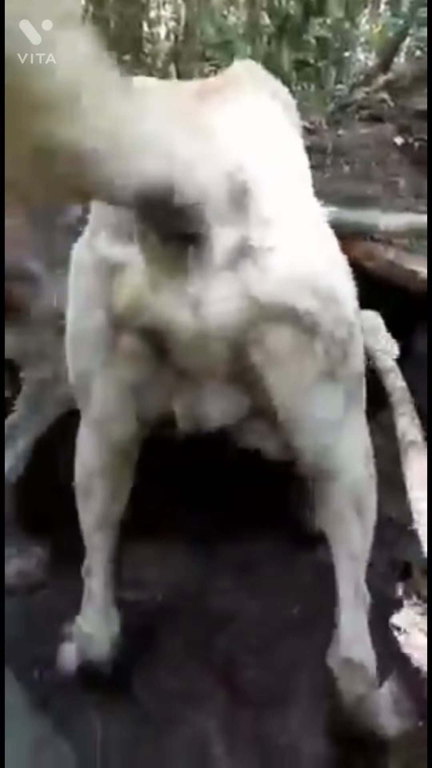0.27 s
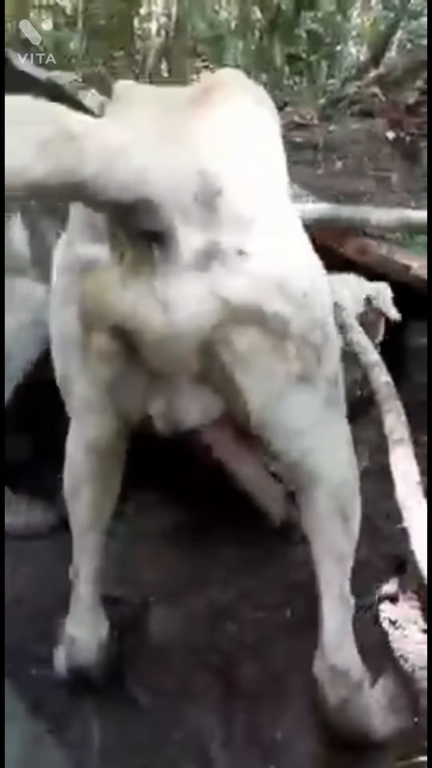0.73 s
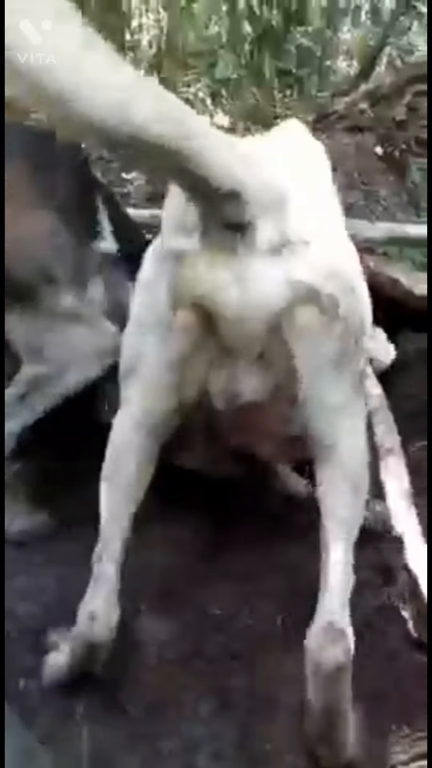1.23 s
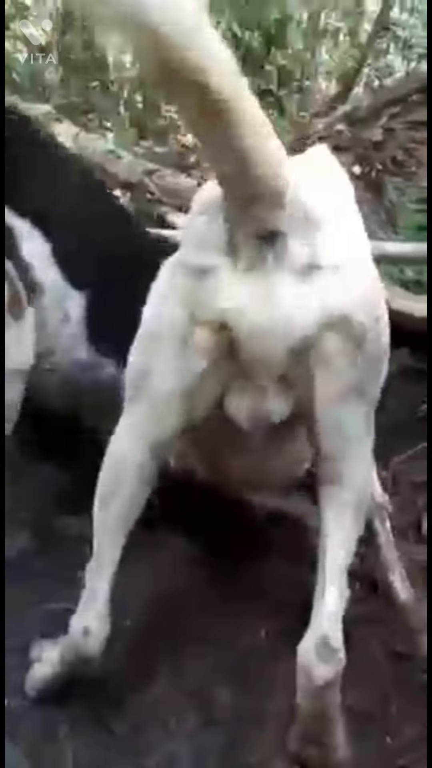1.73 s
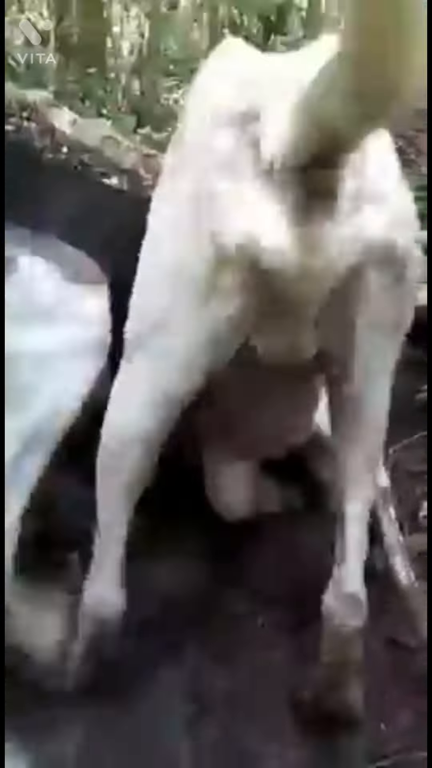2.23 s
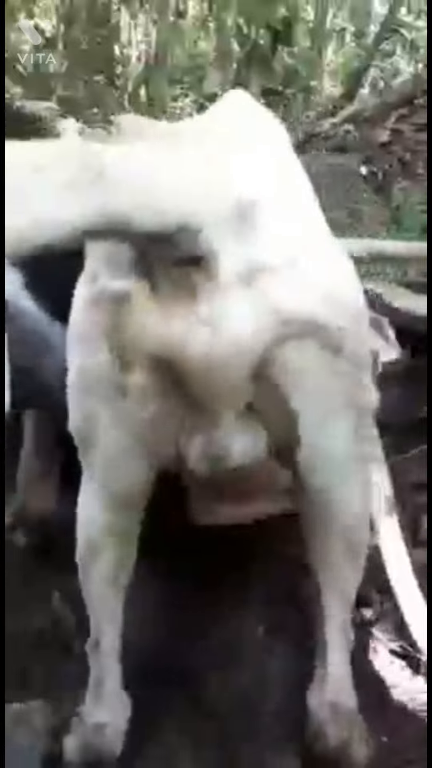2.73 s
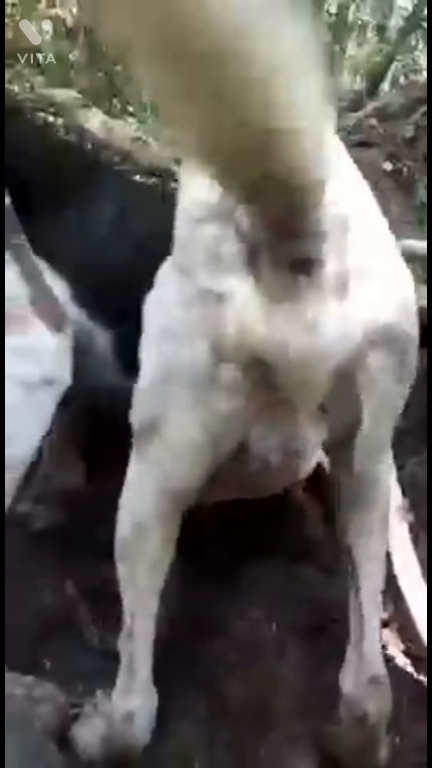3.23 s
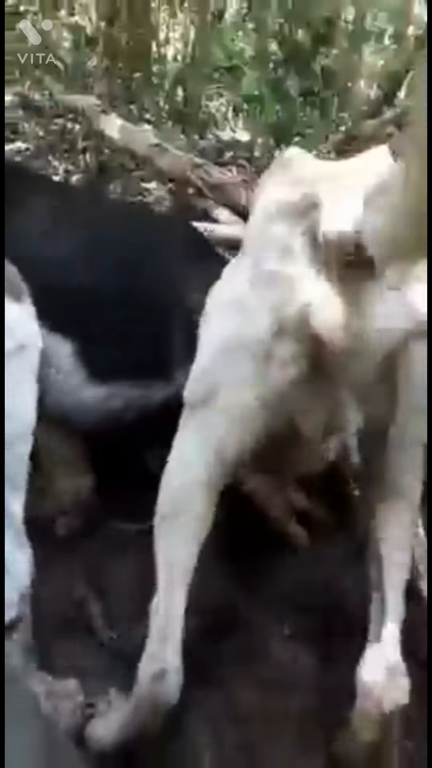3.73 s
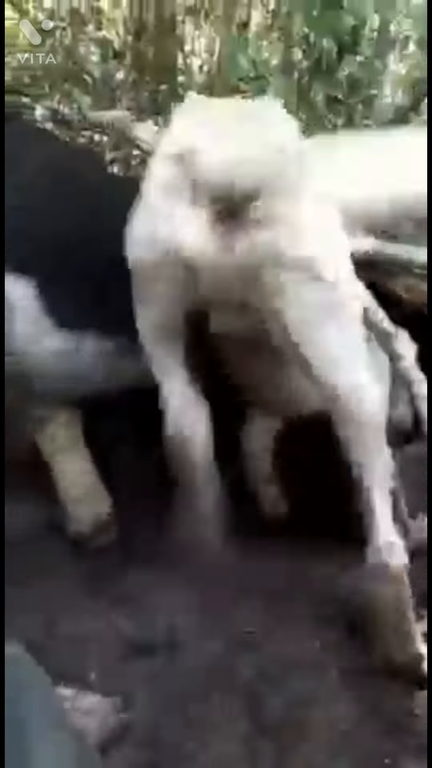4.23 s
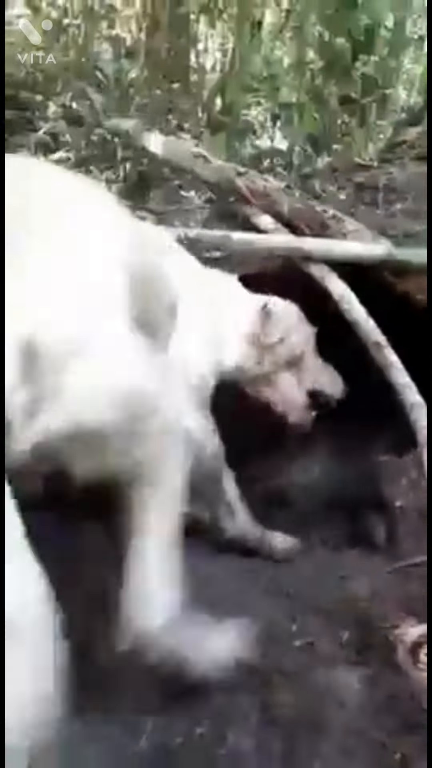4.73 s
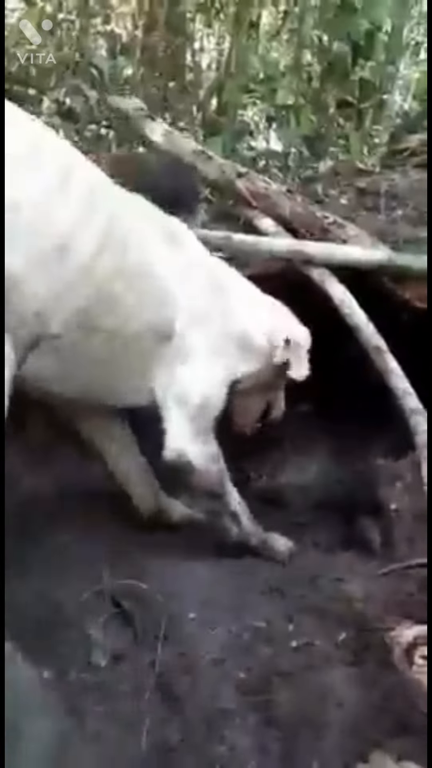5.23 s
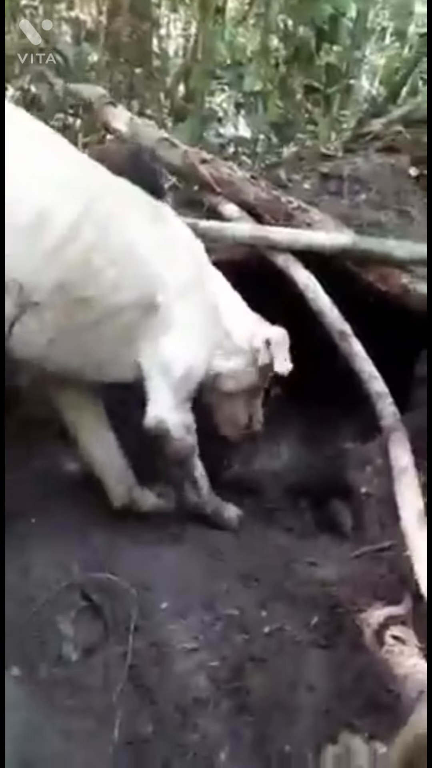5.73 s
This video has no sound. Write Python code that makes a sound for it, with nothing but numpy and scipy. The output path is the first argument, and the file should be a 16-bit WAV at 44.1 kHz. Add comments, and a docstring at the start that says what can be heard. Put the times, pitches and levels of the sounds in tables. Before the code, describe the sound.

Dogs are heard close by in a still wood. At the start one dog holds a clear, slightly rising bay for about 0.8 seconds, with brief growls beneath it and a small yelp at its end. Until 2 seconds there is mostly faint panting, snuffling and scuffling, with soft paw thuds on earth and a few tiny twig snaps. At 2 and 2.3 seconds come two loud barks, arching in pitch and raspy at the edges. Near 2.8 seconds a growl ends in a short hiss through the teeth. Another bark lands at 3.5 seconds, and from 4 to 5 seconds rough barks and short snarls crowd together. At 5 seconds a second, shorter bay cracks briefly and then holds its note. Two barks close, at about 5.5 and 6 seconds. Soft snuffling runs underneath, and the trees give each call a faint tail.

```python
"""Hunting dogs crowd a hole in an earth bank in a wood, close by, panting and snuffling amid soft scuffling.
First one dog bays, its vocal folds holding a clear note. Growls follow, slow pulses ringing the throat,
and at 2 s come two loud barks, arched in pitch and raspy at the edges. Near 3 s a long growl ends in a
hiss through the teeth. Barks and snarls then crowd together, a second bay cracks just after 5 s, and two
barks close the scene. Paws thud now and then, and the trees give each sound a faint tail."""
import sys
import numpy as np
from scipy import signal
from scipy.fft import rfft, irfft, next_fast_len
from scipy.io import wavfile
from scipy.ndimage import uniform_filter1d, minimum_filter1d

SR = 44100
rng = np.random.default_rng(int(sys.argv[2]) if len(sys.argv) > 2 else 0)


def inscribe(sig):
    """Save sig as 16-bit PCM at rate SR to the path in sys.argv[1].

    A 1-D sig is mono; a 2-D sig holds one channel per row.
    Samples are clipped to [-1, 1] before scaling.
    """
    pcm = np.round(np.clip(np.atleast_2d(sig).T, -1, 1) * 32767)
    wavfile.write(sys.argv[1], SR, pcm.astype(np.int16))


N = 263718
TIME = np.arange(N) / SR

# spectrum of still forest air: (frequency [Hz], level [dB])
AIR_SPECTRUM = [(30, -25), (100, -10.5), (330, -3.5), (1000, -10), (2000, -18.5), (3000, -23.5),
                (4000, -33), (6300, -23), (10000, -34)]
# spectrum of the tail among the trees: (frequency [Hz], level [dB])
TAIL_SPECTRUM = [(100, -6.5), (400, -0.5), (1100, -7), (2200, -3.5), (4000, 3.5), (12000, -6.5)]
# side reflections off the bank and the ground: (delay [ms], level [dB])
BANK_ECHOES = [(1.099, -17.5), (2.301, -14), (3.703, -3), (6.1, -12.5)]
# reflections from the mouth of the hole: (delay [ms], level [dB])
HOLE_ECHOES = [(2.12, -19), (5.3, -19.5), (8.4, -16)]
# spectrum of panting, snuffling and soft scuffling: (frequency [Hz], level [dB])
SNUFFLE_SPECTRUM = [(30, -30.5), (100, -6), (430, -2.5), (600, -11.5), (1100, -7.5), (2000, -16.5),
                    (3000, -28), (4000, -35), (6300, -31.5), (10000, -38), (16000, -41)]
# spells of panting and snuffling amid soft scuffling: (start [s], length [s], level [dB])
SNUFFLES = [(0, 1.136, -57.5), (1.05, 0.053, -56), (1.15, 0.088, -52.5), (1.29, 0.21, -59.5),
            (1.6, 0.1, -50.5), (1.88, 1.22, -55), (3.6, 0.067, -45), (3.97, 1.24, -53), (4.8, 1.08, -54.5)]
# paw falls: (time [s], peak level [dB])
PAW_FALLS = [(.05, -44.5), (.932, -38.5), (1.075, -51.5), (1.21, -55), (1.625, -52), (1.765, -51.5),
             (2.665, -53), (3.05, -72.5), (3.645, -55.5), (5.66, -41)]
# resonances of the ground: (frequency [Hz], width [Hz], gain [dB])
GROUND_MODES = [(106, 20, 4), (190, 15, -8), (420, 57, -12)]
# twigs snapping underfoot: (time [s], peak level [dB])
TWIG_SNAPS = [(1.129, -55), (1.53, -56), (1.958, -50)]
# resonances of a twig: (frequency [Hz], width [Hz], gain [dB])
TWIG_MODES = [(1880, 790, 0), (7120, 6000, 0.5)]
# growls and snarls: (start [s], length [s], pulse rate [Hz], chest level [dB], snarl level [dB])
GROWLS = [(0.293, 0.09, 126, -38.5, -46), (0.77, 0.056, 128, -42, -40.5), (1.417, 0.013, 137, -36.5, -49),
          (1.95, 0.05, 124, -40, -62.5), (1.985, 0.037, 172, -35.5, -37.5), (2.197, 0.12, 210, -36.5, -40),
          (2.728, 0.022, 178, -31, -41.5), (2.759, 0.042, 199, -30, -38), (2.806, 0.1, 183, -30.5, -42.5),
          (2.923, 0.047, 192, -46.5, -44.5), (3.391, 0.046, 175, -34.5, -44.5),
          (4.124, 0.11, 230, -45.5, -40.5), (4.21, 0.11, 188, -32.5, -34), (4.501, 0.09, 133, -49.5, -37.5),
          (4.635, 0.057, 135, -30.5, -53.5), (4.698, 0.068, 127, -37, -64.5),
          (4.826, 0.027, 91, -30, -29.5)]
# resonances of the chest and the upper throat: (frequency [Hz], width [Hz], gain [dB])
CHEST_MODES = [(119, 53, 2), (312, 61, 6), (676, 67, -16)]
SNARL_MODES = [(710, 190, 20), (1100, 840, -7), (1930, 290, 6), (2400, 130, -3.5), (7300, 3800, -26)]
# spectra of the hiss through teeth, breathy rasp and high sizzle: (frequency [Hz], level [dB])
TEETH_SPECTRUM = [(300, -25), (1200, -8), (2000, 1), (2550, 1), (3000, -14.5), (3500, -15), (4500, -33.5),
                  (7500, -25), (12000, -35)]
RASP_SPECTRUM = [(30, -57), (150, -32), (300, -15.5), (800, 2), (1300, -1.5), (2100, -11.5), (2600, -13.5),
                 (3000, -25.5), (3400, -52), (6500, -39.5), (10000, -48.5)]
SIZZLE_SPECTRUM = [(3000, -22), (3700, -12.5), (4270, -3.5), (4500, -11), (4740, -5.5), (5000, -9.5),
                   (6300, 0), (7500, -6), (8700, -12.5), (10000, -20.5), (12500, -14), (16000, -23.5)]
# long bays: (time [s], pitch [Hz], fundamental [dB], octave [dB], third partial [dB])
FIRST_BAY = [(0.0, 505.8, -19, -26.5, -50.5), (0.02, 511.5, -17.5, -15, -42.5),
             (0.046, 516.4, -12.5, -19, -33.5), (0.118, 521.9, -12.5, -15.5, -39),
             (0.384, 544.4, -10.5, -21, -45), (0.55, 558.7, -10.5, -23.5, -46),
             (0.652, 552.2, -10.5, -29.5, -53.5), (0.704, 546.5, -10.5, -25.5, -48),
             (0.73, 549.5, -12, -32.5, -67), (0.748, 543.8, -12, -32.5, -37.5),
             (0.76, 551.4, -10, -58, -32), (0.775, 554.5, -14, -29.5, -31.5)]
SECOND_BAY = [(5.0, 475, -36, -25, -52.5), (5.014, 511.4, -23.5, -17, -41), (5.042, 522.5, -16.5, -14, -29),
              (5.144, 526.8, -16.5, -16, -37), (5.404, 533.7, -20, -19.5, -49),
              (5.432, 537.4, -16.5, -18, -46), (5.44, 536, -19, -18.5, -51)]
# response of the open throat in a bark: (frequency [Hz], gain [dB])
THROAT_RESPONSE = [(100, -21.5), (300, 7.5), (400, 10), (530, 5.5), (700, 7), (1400, 9), (1900, 5.5),
                   (2250, 4), (2600, -9), (3200, -45.5)]
# barks: (start [s], rise [s], fall [s], first pitch [Hz], top pitch [Hz], last pitch [Hz],
# roundness of the rise [exponent], level [dB], swell to the top [dB], mouth resonance at first [Hz],
# mouth resonance at the top [Hz], bite resonance [Hz], bite gain [dB], tilt [dB/octave],
# edge roughness [dB], sizzle [dB re voice])
BARKS = [(.778, .012, 0.031, 533, 520, 335, 1.0, -25.5, -1.5, 454, 550, 1620, 7, 2.5, -10.5, -40),
         (2.016, 0.1, 0.078, 316.6, 573.5, 359, 1.33, -11, 2, 500, 1010, 1960, 11, 2, -7.5, -33.5),
         (2.285, 0.11, 0.065, 312, 483.6, 300.5, 1.62, -12.5, 4, 259, 870, 1870, 3, 3, -6.5, -36.5),
         (3.427, 0.12, .05, 280.2, 541.3, 399, 1.75, -11, 3, 876, 1115, 1950, 9.5, -2, -8, -42),
         (3.998, .089, .036, 288.6, 588.7, 405, 1.04, -16.5, -3.5, 873, 810, 2170, 5, 2.5, -7.5, -37),
         (4.124, 0.039, 0.028, 376.2, 402.3, 354, 1.65, -22.5, 0, 378, 450, 1900, -2.5, -6.5, -7, -44.5),
         (4.329, 0.11, 0.061, 300.4, 531.5, 306, 1, -11, 11.5, 746, 1115, 1990, 15.5, 1.5, 0, -31.5),
         (4.497, 0.014, 0.044, 305, 300, 255, 1.08, -24.5, 9.5, 950, 890, 1900, 3.5, -7, -8, -40),
         (4.853, .114, 0.018, 314.2, 528, 517, 1.43, -12.5, -1.5, 693, 1000, 1980, 14, 3, -2, -36.5),
         (4.927, 0.014, 0.07, 584.3, 605, 436, 1.7, -12, 11, 395, 530, 1750, -0.5, -5, -18, -41.5),
         (5.451, 0.11, 0.051, 291.5, 539.6, 370, 1.8, -14, 3.5, 960, 1005, 2026, 23, -1, -0.5, -33.5),
         (5.941, 0.034, .06, 315.3, 536.5, 344, 0.86, -12.5, 6.5, 990, 866, 1850, 13, 0, -12, -35)]

CUTOFF_HZ = 15800


def from_db(db):
    """Amplitude ratio of a level in decibels."""
    return 10 ** (np.asarray(db) / 20)


def rms_one(x):
    """Normalisation to unit rms."""
    return x / np.sqrt(np.mean(x ** 2) + 1e-20)


def at_hz(spectrum, hz):
    """Interpolation of a spectrum in dB on a log-frequency axis."""
    frequencies, db = np.transpose(spectrum)
    return np.interp(np.log(np.maximum(hz, 1)), np.log(frequencies), db)


def noise(spectrum, size):
    """Spectral shaping of white noise, at unit rms."""
    padded = next_fast_len(size)
    gains = from_db(at_hz(spectrum, np.fft.rfftfreq(padded, 1 / SR)))
    return rms_one(irfft(rfft(rng.standard_normal(padded)) * gains, padded)[:size])


def drift(rate, size):
    """Random modulation of unit spread, changing course about rate times a second."""
    steps = np.arange(size) * rate / SR
    knots = np.random.default_rng(rng.integers(2 ** 31)).standard_normal(int(steps[-1]) + 2)
    return np.interp(steps, np.arange(len(knots)), knots) * np.sqrt(3 / 2)


def envelope(t, length_s, attack_s, release_s):
    """Amplitude envelope with rounded attack and release; t counts from the onset."""
    return (1 + np.tanh(t / attack_s / 2)) * (1 - np.tanh((t - length_s) / release_s / 2)) / 4


def span(start_s, length_s):
    """Time window with room for a call's attack and tail: sample indices and times from onset."""
    at = np.arange(max(int((start_s - .05) * SR), 0), min(int((start_s + length_s + .16) * SR), N))
    return at, at / SR - start_s


def superpose(calls):
    """Linear superposition of (sample indices, sound) pairs."""
    out = np.zeros(N)
    for at, sound in calls:
        out[at] += sound
    return out


def delayed(x, ms):
    """Propagation delay, to a fraction of a sample."""
    return np.interp(TIME - ms / 1000, TIME, x, left=0)


def highpass(x, order, hz):
    """Attenuation below a corner frequency."""
    return signal.sosfilt(signal.butter(order, hz, "high", fs=SR, output="sos"), x)


def resonate(x, modes):
    """Damped resonators in parallel, each applied twice for deep valleys between the peaks."""
    out = 0
    for k, (hz, width, db) in enumerate(modes):
        radius = np.exp(-np.pi * width * np.pi / 2 / SR)
        b = np.array([1, 0, -1]) * (1 - radius ** 2) / 2
        a = [1, -2 * radius * np.cos(2 * np.pi * hz / SR), radius ** 2]
        out = out + (-1) ** k * from_db(db) * signal.lfilter(b, a, signal.lfilter(b, a, x + 1e-18))
    return out


def forest_air():
    """Partial coherence: ambient noise common to both ears, plus a little at each alone."""
    common, left, right = [noise(AIR_SPECTRUM, N) for _ in range(3)]
    return from_db(-69) * (common + 0.35 * np.array([left, right]))


def trees(x, wet_db=-21.5, t60_s=0.48, build_s=0.0037, width=.6):
    """Reverberation: scatter from trunks builds up and decays exponentially, differing at each ear."""
    t = TIME[:SR]
    shape = from_db(-60 * t / t60_s) * (1 - np.exp(-t / build_s))
    mid, side = [noise(TAIL_SPECTRUM, SR) * shape / np.sqrt(np.sum(shape ** 2)) for _ in range(2)]
    tails = [signal.fftconvolve(x, mid + sign * width * side)[:N] for sign in (1, -1)]
    return from_db(wet_db) / 2 * np.array(tails)


def bank(x, pan_db, left_lead_ms, echo_db, centring=.16):
    """Level and time differences between the ears place a source; side reflections widen it."""
    bright = highpass(x, order=2, hz=1000)
    side = sum(from_db(db + echo_db) * delayed(bright, ms) for ms, db in BANK_ECHOES)
    side += (delayed(x, -left_lead_ms / 2) - delayed(x, left_lead_ms / 2)) / 2
    side += centring * highpass(x, order=1, hz=1900)   # treble sits nearer the centre
    pan = from_db([[pan_db / 2], [-pan_db / 2]])
    return x * pan / pan.mean() + side * np.array([[1], [-1]])


def hole(x):
    """Comb filtering: close echoes interfere with the direct sound and ripple gliding overtones."""
    return x + sum(from_db(db) * delayed(x, ms) for ms, db in HOLE_ECHOES)


def snuffling(grain_db=2.0, puff_db=2.5):
    """Modulated noise: dogs pant and snuffle amid soft scuffling, in short, uneven, low puffs."""
    spells = sum(from_db(db) * envelope(TIME - start_s, length_s, attack_s=0.0089, release_s=0.029)
                 for start_s, length_s, db in SNUFFLES)
    return noise(SNUFFLE_SPECTRUM, N) * spells * from_db(puff_db * drift(30, N) + grain_db * drift(79, N))


def impacts(rows, modes, crumble_s):
    """Impact excitation: each contact is a short crumbling burst that rings the given modes."""
    out = np.zeros(N)
    for start_s, db in rows:
        start = int(start_s * SR)
        t = TIME[:min(SR // 8, N - start)]
        hit = resonate(rng.standard_normal(len(t)) * np.exp(-t / crumble_s), modes)
        out[start:start + len(t)] += from_db(db) * hit / np.abs(hit).max()
    return out


def paws():
    """Impact and fracture: paws thud on the ground and snap twigs."""
    thuds = impacts(PAW_FALLS, GROUND_MODES, crumble_s=0.012)
    snaps = impacts(TWIG_SNAPS, TWIG_MODES, crumble_s=0.0035)
    return thuds + snaps


def folds(pitch, jitter, jitter_rate):
    """Phase of the vocal folds: the integral of a frequency that wavers by the fraction jitter."""
    return 2 * np.pi * np.cumsum(pitch * (1 + jitter * drift(jitter_rate, len(pitch)))) / SR


def growl(row, jitter=.028, uneven_db=2.0, chest_air=0.088, snarl_air=0.15, sag_octaves_per_s=.8):
    """Pulse excitation: slow, uneven pulses ring the chest and, with bared teeth, the upper throat."""
    start_s, length_s, pulse_hz, chest_db, snarl_db = row
    at, t = span(start_s, length_s)
    pitch = pulse_hz * 2 ** (-sag_octaves_per_s * (t - length_s / 2))   # slows as the breath runs out
    phase = folds(pitch, jitter, jitter_rate=130)
    pulses = np.diff(phase // (2 * np.pi), prepend=0) * from_db(uneven_db * drift(150, len(at)))
    air = rng.standard_normal(len(at)) * (1 + np.cos(phase)) / 2
    chest = from_db(chest_db) * rms_one(resonate(pulses + chest_air * air, CHEST_MODES))
    snarl = from_db(snarl_db) * rms_one(resonate(pulses + snarl_air * air, SNARL_MODES))
    return at, envelope(t, length_s, attack_s=0.0022, release_s=0.0086) * (chest + snarl)


def teeth(start_s=2.922, level_db=-39.5):
    """Turbulence: air forced between bared teeth ends the long growl in a hiss."""
    puff = envelope(TIME - start_s, length_s=0.024, attack_s=0.0022, release_s=.025)
    return from_db(level_db) * puff * noise(TEETH_SPECTRUM, N)


def sizzle(phase, pitch, blur_rad, hiss, single_db=2.8, group_db=4):
    """Harmonic series: a thin, distortion-like sizzle of high harmonics and hiss rides on loud calls."""
    size = len(phase)
    k = np.arange(5, 42)[:, None]
    uneven = phase + blur_rad * drift(600, size)
    groups = np.array([drift(30, size) for _ in range(11)])
    singles = np.array([drift(25, size) for _ in k])
    swell_db = single_db * singles + group_db * groups[k[:, 0] // 4]
    gains = from_db(at_hz(SIZZLE_SPECTRUM, k * pitch) + swell_db) * (k * pitch < CUTOFF_HZ)
    harmonics = (gains * np.cos(k * uneven + k ** 2)).sum(0)
    return rms_one(rms_one(harmonics) + hiss * noise(SIZZLE_SPECTRUM, size))


def voice_crack(times, phase, partials, start_s=5.04, gain_db=-16):
    """Period doubling: alternate cycles briefly differ, adding lines halfway between the partials."""
    between = np.sqrt(partials[:-1] * partials[1:])
    halves = sum(gain * (k + 1) ** 1.27 * np.cos((k + 3 / 2) * phase) for k, gain in enumerate(between))
    gate = envelope(times - start_s, length_s=0.11, attack_s=0.0026, release_s=0.0026)
    return from_db(gain_db) * gate * halves


def bay(rows, release_s, rolloff_db, breath_db, sizzle_db, attack_s=.01, jitter=0.0034):
    """Sustained oscillation of the folds gives a clear note of five harmonics with a little breath."""
    knots_s, *columns = np.transpose(rows)
    at = np.arange(int(knots_s[0] * SR), int((knots_s[-1] + release_s) * SR))
    size = len(at)
    pitch, first_db, second_db, third_db = [np.interp(at / SR, knots_s, column) for column in columns]
    ramp = np.minimum((at - at[0]) / attack_s, (at[-1] - at) / release_s) / SR
    fade = np.sin(np.pi / 2 * np.clip(ramp, 0, 1))
    phase = folds(pitch * (1 + jitter * drift(30, size)), jitter, jitter_rate=250)
    partials = from_db([first_db, second_db, third_db,
                        third_db + rolloff_db, third_db + 2.5 * rolloff_db])
    voice = sum(gain * from_db(0.36 * (k + 2.5) * drift(22, size)) * np.cos((k + 1) * phase + k)
                for k, gain in enumerate(partials))   # higher partials waver more
    voice += voice_crack(at / SR, phase, partials)
    treble = from_db(sizzle_db) * sizzle(phase, pitch, blur_rad=.027, hiss=.35)
    breath = from_db(breath_db) * noise(RASP_SPECTRUM, size)
    return at, fade * (np.sqrt(2) * voice + np.hypot(partials[0], partials[1]) * (breath + treble))


def arch(t, rise_s, fall_s, first_hz, top_hz, last_hz, roundness, sink_hz_per_s=1800, lowest_hz=253.9):
    """Fold tension sets pitch: returns a bark's pitch and slackness (0 at the top, 1 at the edges)."""
    climb = np.maximum(1 - t / rise_s, 0) ** roundness
    drop = (1 - np.cos(np.pi * np.clip((t - rise_s) / fall_s, 0, 1))) / 2
    pitch = top_hz + climb * (first_hz - top_hz) + drop * (last_hz - top_hz)
    pitch -= sink_hz_per_s * np.maximum(t - rise_s - fall_s, 0)   # sinks on after the push ends
    waver = 1 + 0.011 * drift(80, len(t))
    return np.maximum(pitch, lowest_hz) * waver, np.minimum(climb + drop, 1)


def bark(row, mouth_width_hz=260, shut_hz=547, bite_width_hz=170, attack_s=0.0037, shimmer=.45,
         wobble_db=2.43, dull_db_per_octave=5, top_clear_db=16.5, rasp_db=-5, trail_sizzle_db=6):
    """Source and filter: pitch arches while the jaw sweeps a resonance over the harmonics."""
    (start_s, rise_s, fall_s, first_hz, top_hz, last_hz, roundness, level_db, swell_db,
     ajar_hz, open_hz, bite_hz, bite_db, tilt_db, edge_db, sizzle_db) = row
    length_s = rise_s + fall_s
    at, t = span(start_s, length_s)
    size = len(at)
    pitch, slack = arch(t, rise_s, fall_s, first_hz, top_hz, last_hz, roundness)
    effort = envelope(t, length_s, attack_s, release_s=0.0069)
    effort *= from_db(wobble_db * drift(69, size) - swell_db * slack)
    rough = np.minimum(from_db(edge_db - top_clear_db * (1 - slack)), 1)   # raspiest at the edges
    phase = folds(pitch, jitter=0.0025 * (1 + 6 * rough), jitter_rate=350)

    k = np.arange(1, 12)[:, None]
    hz = k * pitch
    mouth_hz = np.interp(t, [0, rise_s, length_s], [ajar_hz, open_hz, shut_hz])
    detune = 2 * (hz - mouth_hz) / mouth_width_hz
    mouth = np.sqrt(0.009 + 1 / (1 + detune ** 2))
    bite_fade = np.interp(t, [rise_s / 2, length_s], [1, 0])   # upper resonance fades as the jaw closes
    upper_db = bite_db * bite_fade / (1 + ((hz - bite_hz) / bite_width_hz) ** 2)
    bright_db = (tilt_db - dull_db_per_octave * slack) * np.log2(hz / 1000)
    waver_db = 2.6 * np.array([drift(70, size) for _ in k])
    gains = mouth * from_db(at_hz(THROAT_RESPONSE, hz) + bright_db + upper_db + waver_db)
    gains /= np.sqrt((gains ** 2).sum(0) / 2)
    flutter = 1 + shimmer * rough * np.array([drift(220, size) for _ in k])
    lag = np.arctan(detune)   # the mouth rings on after each pulse
    voice = -(gains * flutter * np.cos(k * phase - lag)).sum(0)

    rasp = rms_one(noise(RASP_SPECTRUM, size) * (1 + 0.15 * np.cos(phase)))   # air escapes once a cycle
    height = (pitch / top_hz) ** 1.8   # the sizzle is strongest at the top of the arch
    sizzle_gain = from_db(sizzle_db + 3 * drift(45, size)) * height
    treble = sizzle_gain * sizzle(phase, pitch, blur_rad=.04, hiss=.4)
    trail = from_db(-24) * envelope(t, length_s, attack_s, release_s=0.034)   # breath outlasts the voice
    treble *= effort + from_db(trail_sizzle_db) * trail
    breath = (effort * rough + trail) * from_db(rasp_db) * rasp
    return at, from_db(level_db) * (effort * voice + breath + treble)


def scene():
    """Superposition of the direct sound of dogs and paws, its reflections and the forest air."""
    barks = hole(superpose(bark(row) for row in BARKS))
    growls = superpose(growl(row) for row in GROWLS) + teeth()
    bays = superpose([bay(FIRST_BAY, release_s=.03, rolloff_db=-13.5, breath_db=-40.5, sizzle_db=-43),
                      bay(SECOND_BAY, release_s=.16, rolloff_db=-16.5, breath_db=-41, sizzle_db=-39)])
    bustle = snuffling() + paws()
    near = (bank(barks, pan_db=-5.5, left_lead_ms=.03, echo_db=-2.5)
            + bank(bays, pan_db=-4.5, left_lead_ms=0.25, echo_db=-14)
            + bank(growls + bustle, pan_db=-2.5, left_lead_ms=0.12, echo_db=-4))
    return forest_air() + near + trees(barks + growls + bustle + from_db(-2) * bays)


def record(dry, ceiling=.94):
    """Band and peak limiting: a small microphone loses deep bass, peaks are eased, the top is cut."""
    x = highpass(dry, order=1, hz=65)
    allowed = np.minimum(1, ceiling / (np.abs(x).max(0) + 1e-9))
    gain = uniform_filter1d(minimum_filter1d(allowed, size=441), size=441)   # turns down ahead of a peak
    return signal.sosfilt(signal.ellip(10, .1, 80, CUTOFF_HZ, fs=SR, output="sos"), x * gain)


dry = scene()
out = record(dry)
inscribe(out)
```